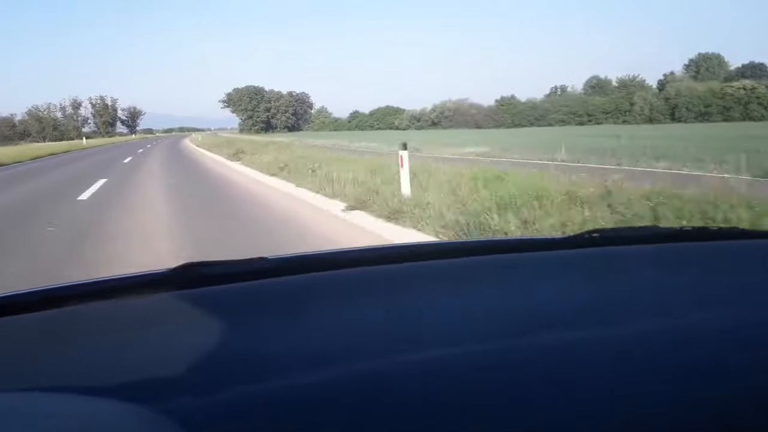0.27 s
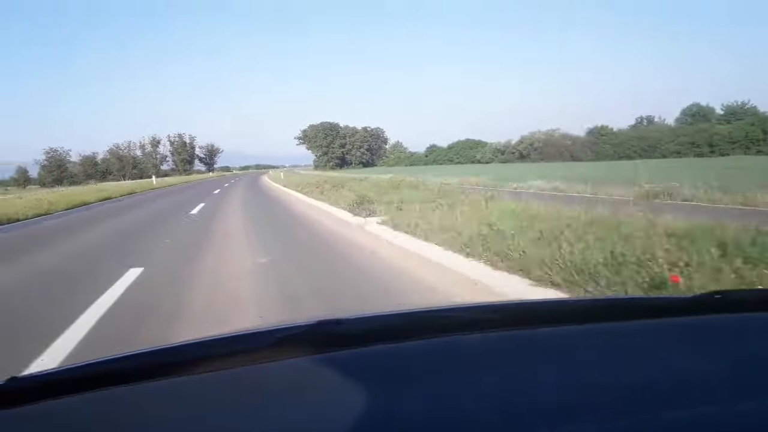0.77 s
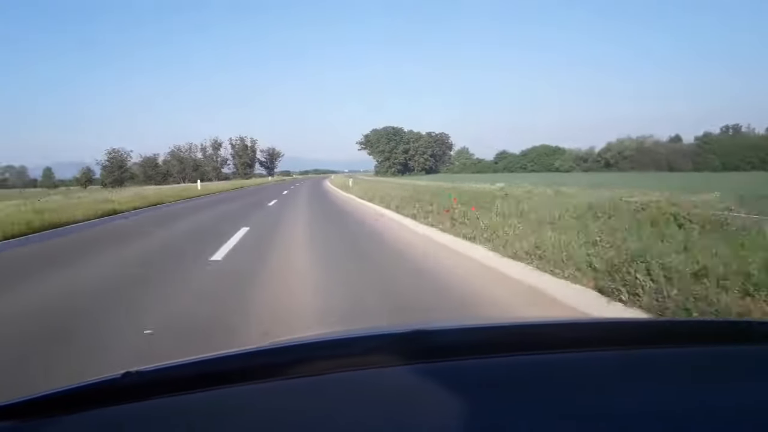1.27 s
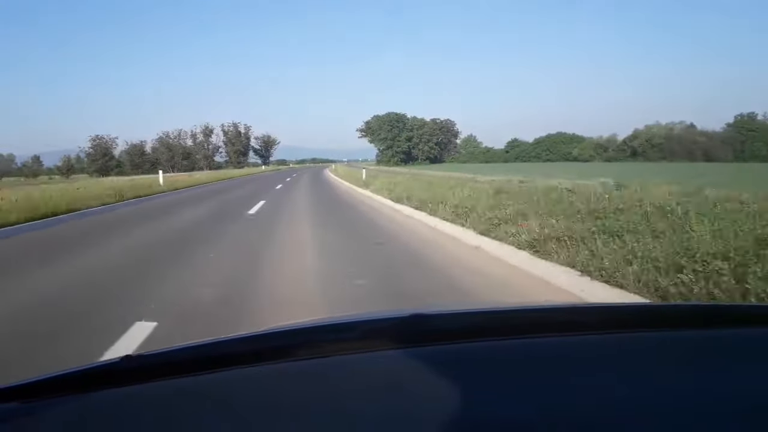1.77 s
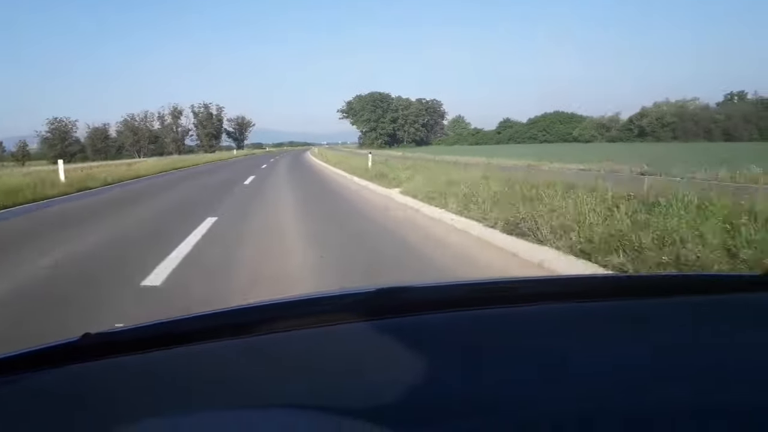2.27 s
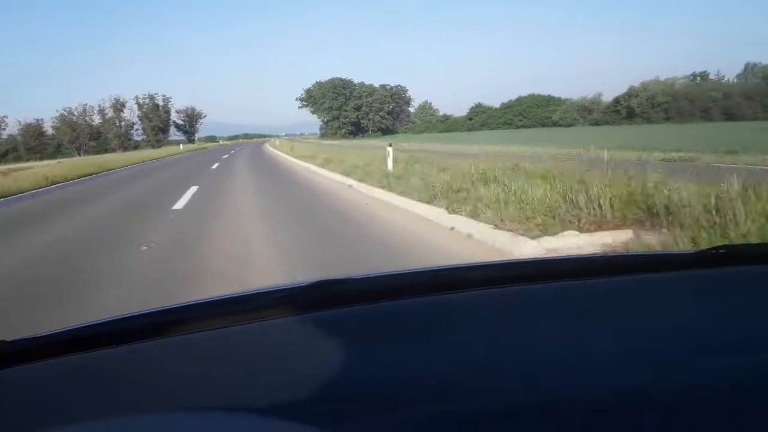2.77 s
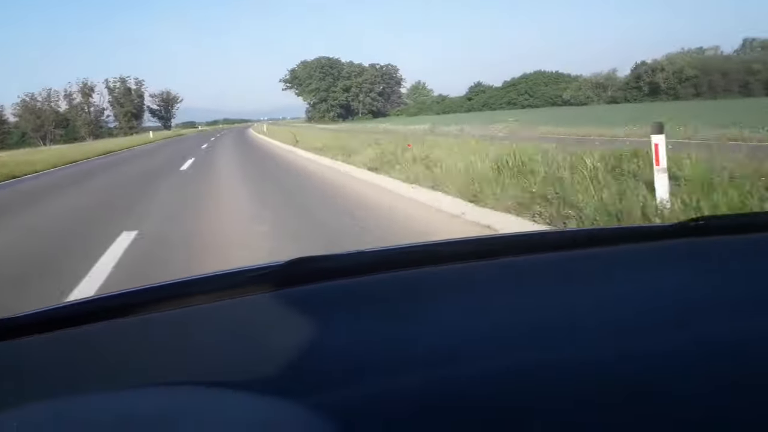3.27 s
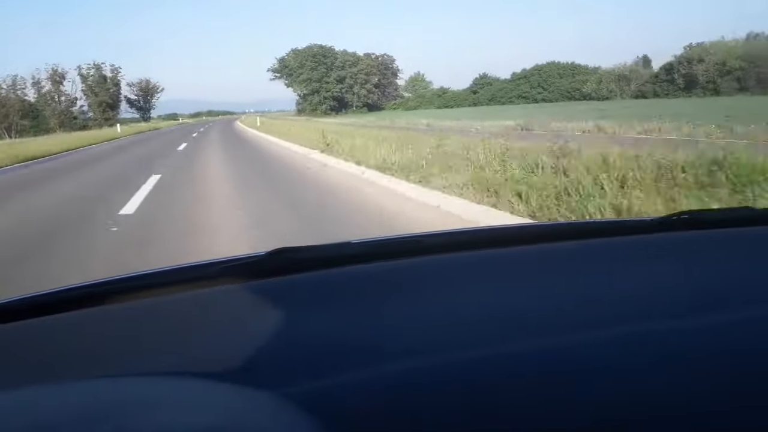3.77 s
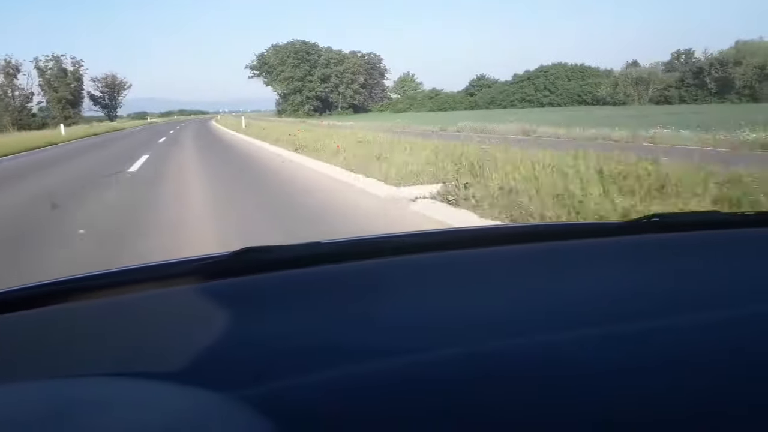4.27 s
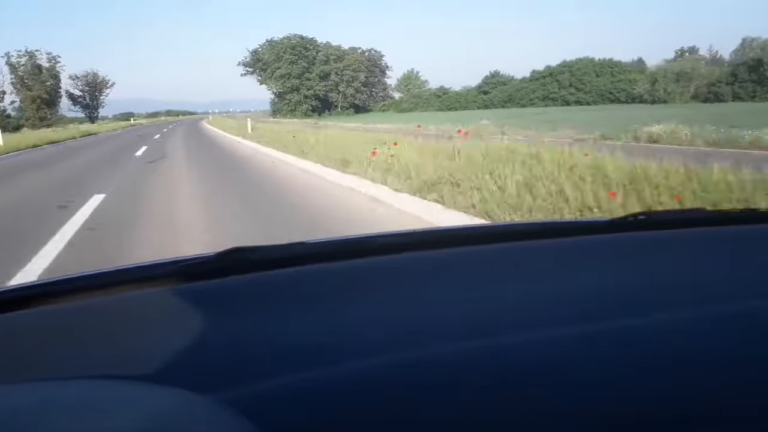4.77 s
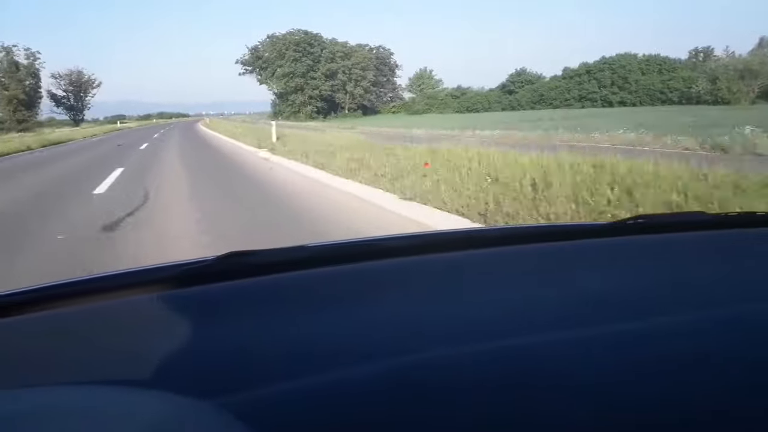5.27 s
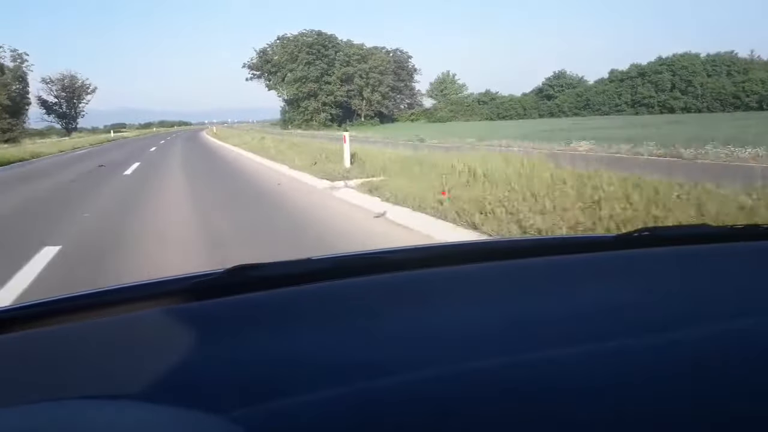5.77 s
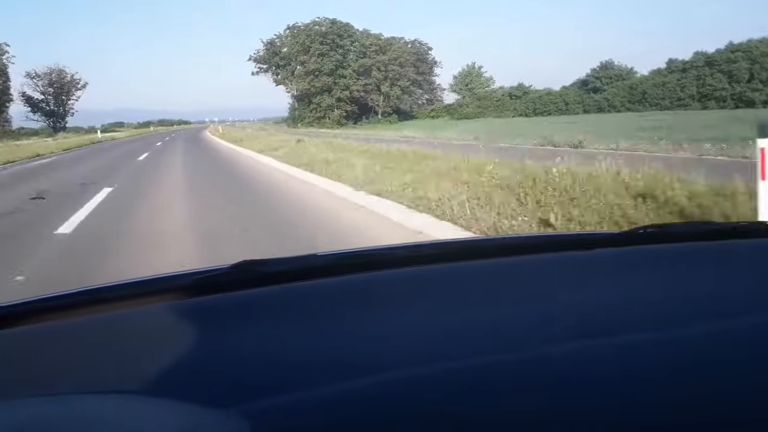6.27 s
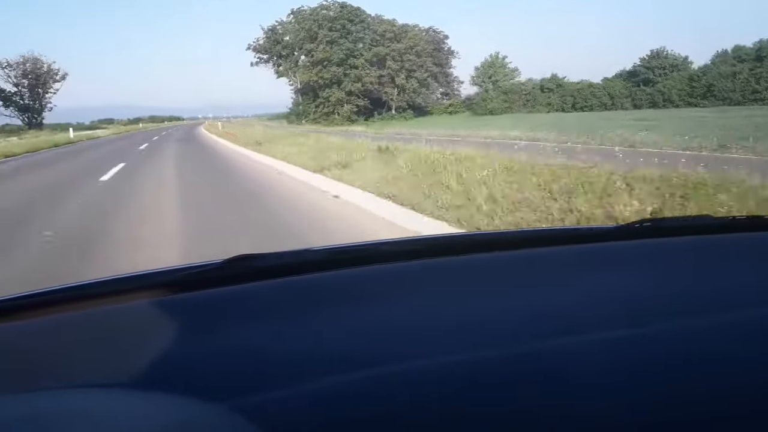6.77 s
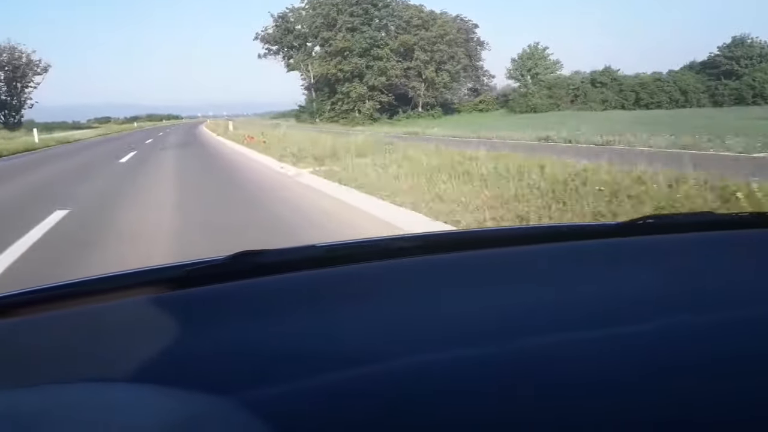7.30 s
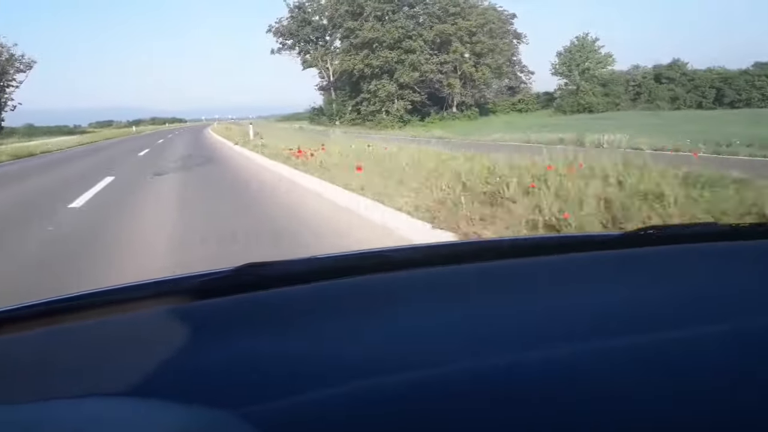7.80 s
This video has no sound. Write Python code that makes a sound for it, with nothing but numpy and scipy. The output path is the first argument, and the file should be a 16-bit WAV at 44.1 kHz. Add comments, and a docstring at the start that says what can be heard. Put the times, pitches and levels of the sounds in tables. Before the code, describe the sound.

Inside a moving car, a worn wheel bearing hums and howls steadily over rumbling tyres, low road roar and a droning engine.

```python
"""Inside a car at near-steady speed on a country road, a worn wheel bearing hums, heard in the cabin.
Its balls roll over pitted outer and inner races and sound two stacks of tones, whose balance
shifts with the side load in a bend. Behind it the engine drones as a stack of tones, noise from tyres
and road rumbles and roars through the cabin's resonances, and bits of plastic tick faintly as short
bursts of crackle. The microphone lays a faint hiss over it all."""
import sys
import numpy as np
from scipy import signal
from scipy.fft import rfft, irfft, next_fast_len
from scipy.io import wavfile
from scipy.ndimage import uniform_filter1d

SR = 44100
rng = np.random.default_rng(int(sys.argv[2]) if len(sys.argv) > 2 else 0)


def generate_wav(signal):
    """Clip the signal to [-1, 1] and save it as 16-bit WAV at the path in sys.argv[1]."""
    frames = np.transpose(np.atleast_2d(signal))
    scaled = np.clip(frames, -1, 1) * 32767
    pcm = np.round(scaled).astype(np.int16)
    wavfile.write(sys.argv[1], SR, pcm)


N = 354431
TIME = np.arange(N) / SR  # s
BINS = np.maximum(np.arange(N // 2 + 1) * SR / N, 1)  # Hz, kept off zero for the log axis

# microphone hiss: f/Hz, level/dB per Hz
HISS_SPECTRUM = [(2000, -109), (5500, -105), (6400, -101.5), (6950, -99.5), (7400, -105), (8000, -119),
                 (9800, -116), (12000, -111.3), (16000, -110.3)]
# plastic ticks: t/s, peak level/dB, centre f/Hz, width/Hz
PLASTIC_TICKS = [(.842, -32, 5500, 2500), (0.842, -42, 11000, 5000), (1.797, -45, 5500, 2500),
                 (1.92, -46, 6000, 3000), (1.928, -51, 8000, 7000), (1.941, -40.5, 7000, 2000),
                 (1.944, -45, 12500, 4000), (2.094, -47, 5500, 2500), (3.171, -46, 11000, 7000),
                 (3.975, -43, 6500, 2000), (4.139, -42, 6600, 1800), (4.802, -47, 6800, 1200),
                 (5.815, -48, 6800, 1400), (6.229, -45, 7000, 1200), (6.672, -46, 6500, 1800),
                 (6.694, -50, 4700, 400), (6.816, -45, 5400, 1590), (7.067, -49, 7000, 1200),
                 (7.368, -46, 6800, 1200), (7.43, -53, 4600, 700), (7.552, -53, 4600, 700),
                 (7.647, -46, 6950, 1200), (7.823, -45, 12000, 8000)]
# road noise through the body, before the low bands are levelled: f/Hz, level/dB per Hz
ROAD_SPECTRUM = [(10, -74), (26, -73), (38, -60), (75, -62.5), (110, -49.5), (165, -52.5), (200, -60.5),
                 (380, -57.5), (450, -64), (800, -65), (1500, -68.5), (2200, -75), (3200, -89.5),
                 (5000, -105), (8000, -128)]
# cabin and tyre resonances: f/Hz, width/Hz, lift/dB
CABIN_RESONANCES = [(43, 10, 10), (60, 9, 12.5), (100, 12, 3), (120.5, 13, 6.5), (138, 20, 4.5),
                    (164, 14, 0.5), (208.5, 5.3, 5.5), (242, 18, 7), (264, 26, 3.5), (291, 20, 4),
                    (350.5, 22, 8), (390, 32, 1.5), (552, 28, 6), (602, 24, 6), (768, 40, 4.5),
                    (1346, 44, 4.5), (1632, 11, 6.5), (1740, 110, -3.5), (1880, 64, 3), (2330, 20, -2)]
# out-of-round tyres, before the low bands are levelled: multiple of the wheel rate, level/dB
TYRE_TONES = [(4, -48), (6, -40), (9, -41.5), (10, -42.5), (11, -37.5), (12, -38.5), (15, -40)]
# coarseness of the asphalt: t/s, tyre rumble level/dB before trim and patches
ASPHALT_RUMBLE = [(0, -27), (.5, -28), (.9, -24.5), (2.4, -26), (4.3, -25.5), (4.75, -29), (5.5, -27.5),
                  (8, -28)]
# rough patches that make the tyres surge: t/s at the middle, length/s, lift/dB
ROUGH_PATCHES = [(.95, .2, 1.5), (2.15, .35, 2.5), (5.85, .25, 3), (7.13, .16, 5.5), (7.83, .2, 4)]
# long dips in the road that set the cabin booming: t/s at the deepest, length/s, lift/dB
ROAD_DIPS = [(.4, .6, 5.5), (1.53, .35, 6), (3.65, 1, 6), (6.4, .75, 6), (7.4, .7, 9.5)]
# engine tones, before throttle: multiple of the four-stroke cycle rate, level/dB
ENGINE_TONES = [(4, -36.5), (8, -42), (11, -43), (12, -41), (13, -46), (15, -50), (16, -35.5), (19, -48.5),
                (24, -50.5), (25, -51), (28, -55.5), (29, -52), (32, -50), (40, -56), (48, -55.5)]
# engine effort: t/s, lift/dB
THROTTLE_EFFORT = [(0, -1), (1, 0), (2, -1.5), (3.8, -2.5), (4.5, 1.5), (6.5, 1.5), (8, -6)]
# wheel speed: t/s, turns per second
WHEEL_SPEED = [(0, 10.608), (1, 10.605), (2, 10.596), (3, 10.59), (4, 10.565), (5, 10.518), (6, 10.497),
               (7, 10.497), (8, 10.486)]
# side load on the bearing: t/s, load 0-1
SIDE_LOAD = [(0, 0.9), (.35, 0.4), (.7, 0.53), (1.2, 0), (2, 0), (3, 0.53), (4, 0.72), (4.7, 0.89),
             (6.5, 0.9), (8, 1)]
# outer race tones: multiple of its ball-pass rate, unloaded level/dB, loaded level/dB
OUTER_TONES = [(2, -36.5, -32.5), (3, -39, -40.5), (4, -38, -35), (5, -37, -40), (6, -43.5, -46.5),
               (7, -44, -41.5), (8, -48, -48), (9, -36.5, -46), (10, -54.5, -57), (11, -44.5, -39),
               (12, -58.5, -54.5), (13, -47, -56.5), (14, -48, -49.5), (15, -61.5, -49.5), (16, -58.5, -50),
               (17, -54.5, -53.5), (18, -55, -67), (19, -54, -74), (20, -61, -46.5), (21, -52, -62),
               (22, -52, -53.5), (24, -49.5, -55.5), (28, -59, -65.5), (30, -63.5, -63.5), (35, -66, -72.5)]
# inner race tones: multiple of its ball-pass rate, sideband/wheel turns,
# unloaded level/dB, loaded level/dB
INNER_TONES = [(1, 1, -45.5, -52.5), (2, -1, -33.5, -38.5), (2, 0, -41.5, -48.5), (2, 1, -32.5, -34),
               (3, -1, -39, -39), (3, 0, -47, -36.5), (3, 1, -46, -47.5), (4, 0, -43, -33),
               (5, -1, -58, -50), (6, -1, -52.5, -53), (6, 1, -51.5, -52.5), (6, 2, -51.5, -52),
               (7, 0, -46.5, -63.5), (8, -1, -61.5, -51), (8, 0, -41.5, -44), (9, 0, -55, -58.5),
               (9, 1, -53, -60.5), (15, -2, -60.5, -52), (15, 0, -65, -52.5), (15, 1, -69.5, -55.5),
               (15, 2, -63, -44), (16, 0, -52.5, -57), (18, -2, -56.5, -63), (18, -1, -55, -60.5)]
# howl in the middle of the hum: t/s, lift/dB
HOWL_LIFT = [(0, 5), (.3, 4), (.8, -0.5), (1.5, 2), (2.6, -4), (3.4, 1.5), (5.5, 0), (8, 1)]
# swells of the low note of the hum: t/s at the middle, length/s, lift/dB
MOAN_SWELLS = [(1.3, 1, 2.5), (5.3, 1.4, 2)]

BALLS, OUTER_PASSES = 15, 6.4337  # balls; ball passes on the outer race per wheel turn
ENGINE_CYCLES = 2.0952  # four-stroke cycles per wheel turn
IN_STEP_S = 5.25  # moment from which the wheel turns are counted
HOWL_HZ, HOWL_WIDTH_HZ = 736, 90
MOAN_HZ, MOAN_WIDTH_HZ = 270, 30
BOOM_DB, SHUDDER_DB = -39.5, -41.5  # air boom on level road; deeper shudder of the body
SWELL_S = 0.28  # shudder, boom and rumble flicker freely within this time
TOP_HZ = 15700


def undb(db):
    """Decibels to gain."""
    return 10 ** (np.asarray(db) / 20)


def curve(rows):
    """Rows of (t/s, value) joined by straight lines."""
    return np.interp(TIME, *np.transpose(rows))


def arches(rows):
    """Rows of (t/s at the middle, length/s, lift/dB): each swells and fades as one smooth arch."""
    lift_db = 0
    for middle, length, db in rows:
        place = np.clip((TIME - middle) / length, -.5, .5)
        lift_db = lift_db + db * np.cos(np.pi * place)
    return lift_db


def walk(rate):
    """Smooth chance through `rate` random values a second, with a spread near 1."""
    knots = rng.standard_normal(512)
    fine = signal.resample(knots, 8 * len(knots))
    return np.interp(TIME * rate * 8, np.arange(len(fine)), fine)


def contour(points):
    """Rows of (f/Hz, level/dB) joined on a log-frequency axis."""
    hz, db = np.transpose(points)
    return np.interp(np.log(BINS), np.log(hz), db)


def bell(hz, centre_hz, width_hz):
    """Shape of a resonance: 1 at its centre, a half at the edges of its width."""
    return 1 / (1 + (2 * (hz - centre_hz) / width_hz) ** 2)


def noise(density_db):
    """Random noise with the given level per Hz."""
    size = next_fast_len(N)
    gain = np.interp(np.arange(size // 2 + 1) * SR / size, BINS, undb(density_db))
    spectrum = rfft(rng.standard_normal(size)) * gain
    return irfft(spectrum, size)[:N] * np.sqrt(SR / 2)


def tone(cycles, db, lag):
    """A sine of the given rms level that follows a count of cycles."""
    return np.sqrt(2) * undb(db) * np.sin(2 * np.pi * (cycles - lag))


def split(x, hz):
    """The parts of a sound below and above a frequency."""
    low_pass = signal.butter(4, hz, fs=SR, output="sos")
    low = signal.sosfiltfilt(low_pass, x, padtype="even")
    return low, x - low


def swell(x, db):
    """Bring the short-term level of a sound onto a level curve."""
    span = int(SWELL_S * SR)
    power = uniform_filter1d(uniform_filter1d(x ** 2, size=span), size=span)
    return x * undb(db) / np.sqrt(power)


def ticks(decay_s=0.00062):
    """Plastic parts slip against each other: a millisecond of crackle in one broad resonance."""
    out = np.zeros(N)
    age = np.arange(SR // 50) / SR
    for s, db, hz, width in PLASTIC_TICKS:
        band = np.clip([hz - width / 2, hz + width / 2], 500, .45 * SR)
        resonance = signal.butter(2, band, "bandpass", fs=SR, output="sos")
        crackle = rng.standard_normal(len(age)) * np.exp(-age / decay_s)
        tick = signal.sosfilt(resonance, crackle)
        start = int(s * SR)
        out[start:start + len(age)] += undb(db) * tick / np.abs(tick).max()
    return out


def tyres(turns, bounce_db=3, bounce_rate=4, scrub_cycles=.1):
    """Out-of-round tyres shake the body at multiples of the wheel rate, unsteadily as they bounce."""
    shake = 0
    for multiple, db in TYRE_TONES:
        cycles = multiple * turns + scrub_cycles * walk(bounce_rate)
        shake = shake + tone(cycles, db + bounce_db * walk(bounce_rate), rng.random())
    return shake


def road(turns, shudder_hz=51, boom_hz=78, rumble_hz=200, throb=0.028, roar_waver_db=0.7,
         rumble_trim_db=-0.24, patchy_db=0.7, patch_rate=7):
    """Asphalt and tyres excite the cabin: shudder, boom in dips, rumble, a roar throbbing each turn."""
    body_db = contour(ROAD_SPECTRUM)
    for hz, width, db in CABIN_RESONANCES:
        body_db = body_db + db * bell(BINS, hz, width)
    bass, rest = split(noise(body_db) + tyres(turns), boom_hz)
    shudder, boom = split(bass, shudder_hz)
    rumble, roar = split(rest, rumble_hz)
    wheel_throb = 1 + throb * np.sin(2 * np.pi * turns)
    roar = roar * undb(roar_waver_db * walk(6)) * wheel_throb
    grain_db = curve(ASPHALT_RUMBLE) + arches(ROUGH_PATCHES) + patchy_db * walk(patch_rate)
    shudder = swell(shudder, SHUDDER_DB)
    boom = swell(boom, BOOM_DB + arches(ROAD_DIPS))
    rumble = swell(rumble, rumble_trim_db + grain_db)
    return shudder + boom + rumble + roar


def engine(turns, waver_db=.9, waver_rate=2.5):
    """Four cylinders geared to the wheels; unequal firings fill in between the main orders."""
    drone = 0
    for multiple, db in ENGINE_TONES:
        cycles = multiple * ENGINE_CYCLES * turns
        drone = drone + tone(cycles, db + waver_db * walk(waver_rate), rng.random())
    return drone * undb(curve(THROTTLE_EFFORT))


def bearing(turns, load, slip_passes=0.0064, slip_rate=3, flutter_db=1.0, flutter_rate=5):
    """Balls pass the pits of both races; the inner pit turns through the loaded zone: sidebands."""
    # the cage slips a little: passes lost on one race are gained on the other
    outer = OUTER_PASSES * turns + slip_passes * walk(slip_rate)
    inner = BALLS * turns - outer
    partials = [(k * outer, free, pressed) for k, free, pressed in OUTER_TONES]
    for k, side, free, pressed in INNER_TONES:
        partials.append((k * inner + side * turns, free, pressed))
    # the body delays each pitch differently; near-equal pitches of the two races
    # share a delay and beat slowly
    lags = rng.random(512)
    hum, howl_db, moan_db = 0, curve(HOWL_LIFT), arches(MOAN_SWELLS)
    for cycles, free_db, pressed_db in partials:
        strength = (1 - load) * undb(free_db) + load * undb(pressed_db)
        per_turn = round(np.ptp(cycles) / np.ptp(turns))
        hz = np.ptp(cycles) / TIME[-1]
        lift_db = howl_db * bell(hz, HOWL_HZ, HOWL_WIDTH_HZ)
        lift_db = lift_db + moan_db * bell(hz, MOAN_HZ, MOAN_WIDTH_HZ)
        flutter = flutter_db * walk(flutter_rate)
        hum = hum + strength * tone(cycles, lift_db + flutter, lags[per_turn])
    return hum


def scene():
    """All that rotates follows the wheels, counted from a moment when both races are struck in step."""
    turns = np.cumsum(curve(WHEEL_SPEED)) / SR
    turns = turns - turns[int(IN_STEP_S * SR)]
    load = np.clip(curve(SIDE_LOAD), 0, 1)
    cabin = ticks() + road(turns) + engine(turns) + bearing(turns, load)
    return cabin[None]  # one microphone channel


def record(dry):
    """The microphone adds its faint hiss; the ends are eased and the top is cut."""
    ease = np.clip(np.minimum(TIME, TIME[-1] - TIME) / .006, 0, 1)
    heard = ease * (dry + noise(contour(HISS_SPECTRUM)))
    top_cut = signal.ellip(10, .1, 80, TOP_HZ, fs=SR, output="sos")
    return signal.sosfilt(top_cut, heard)


dry = scene()
out = record(dry)
generate_wav(out)
```